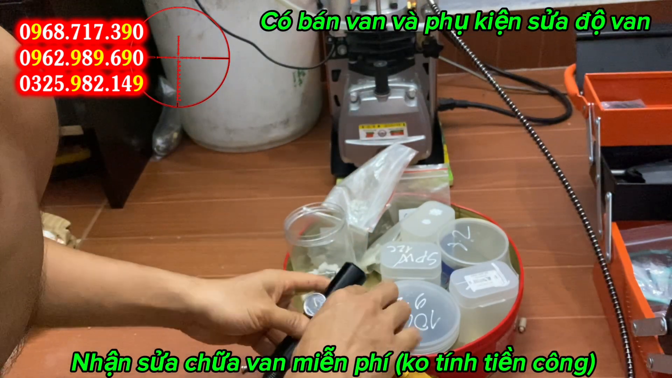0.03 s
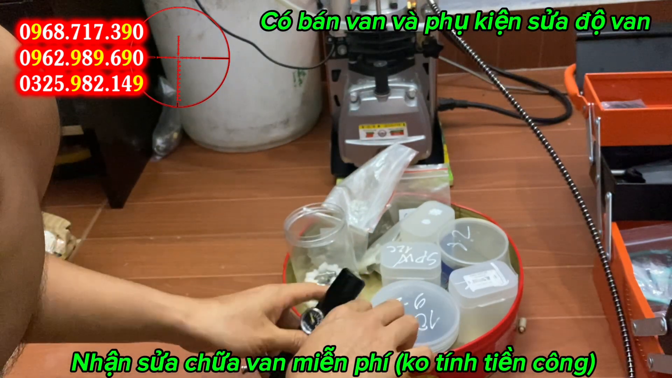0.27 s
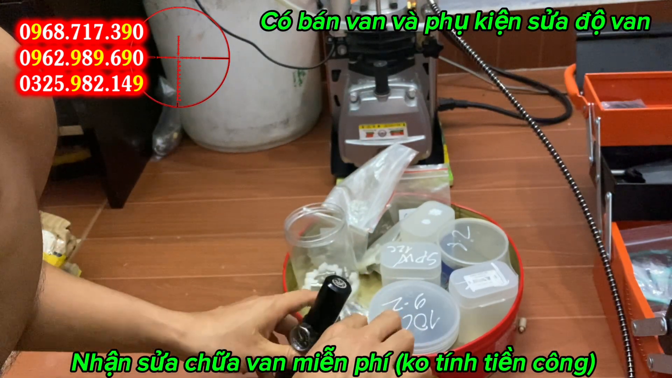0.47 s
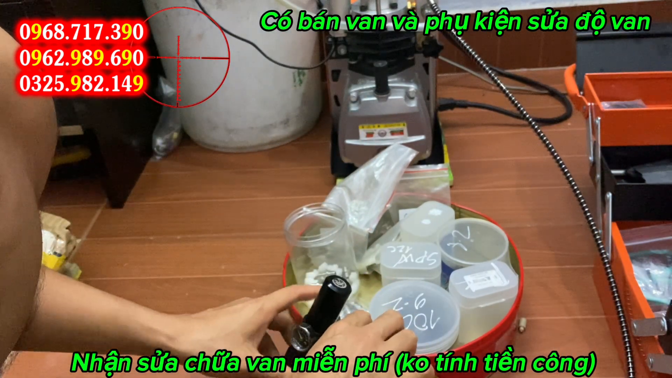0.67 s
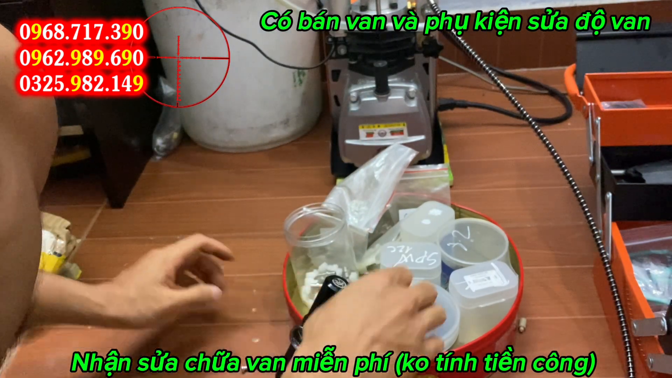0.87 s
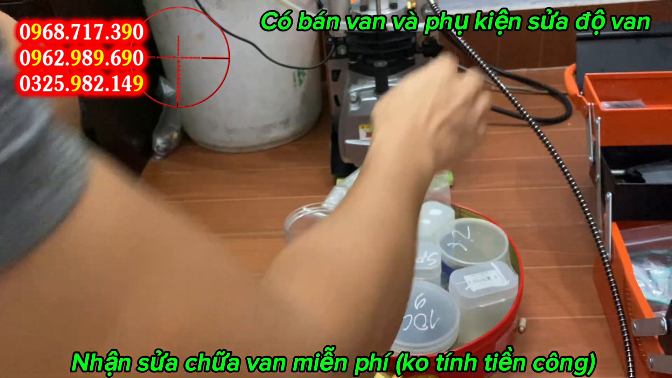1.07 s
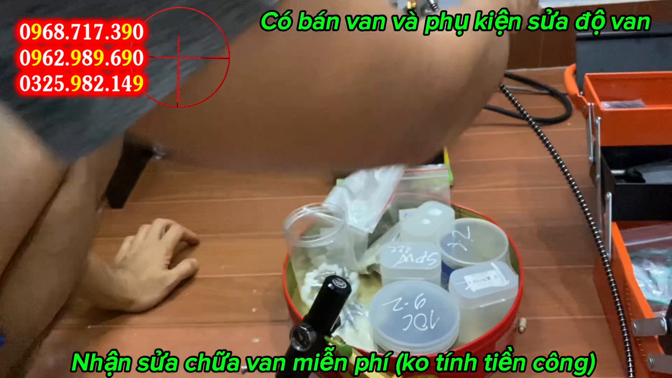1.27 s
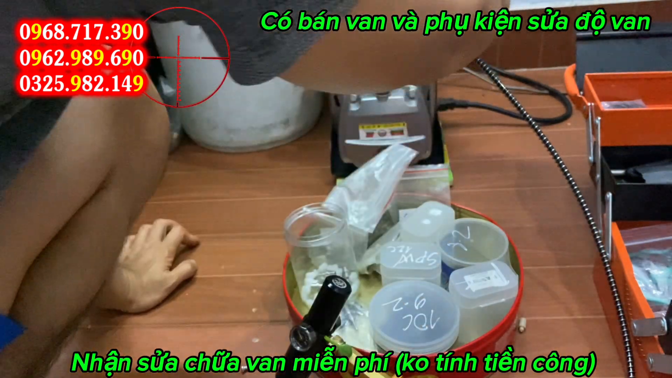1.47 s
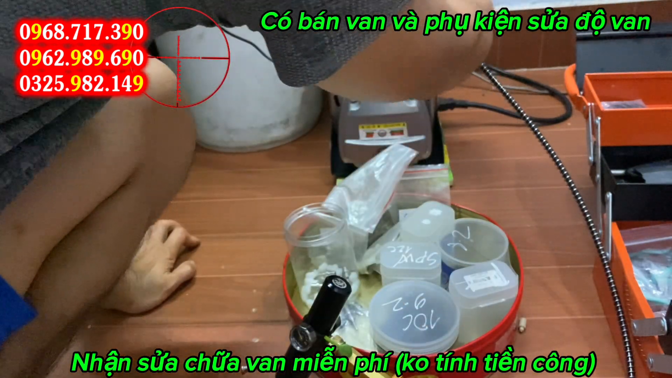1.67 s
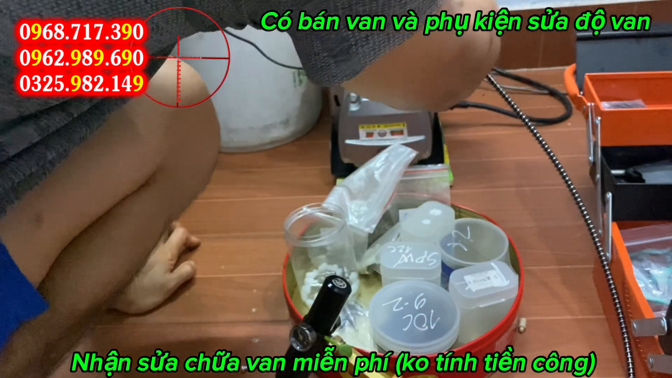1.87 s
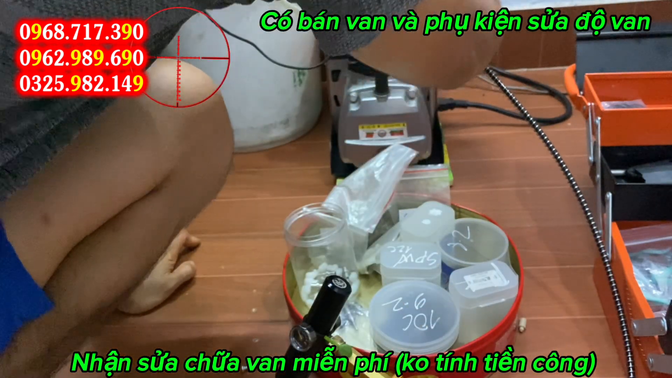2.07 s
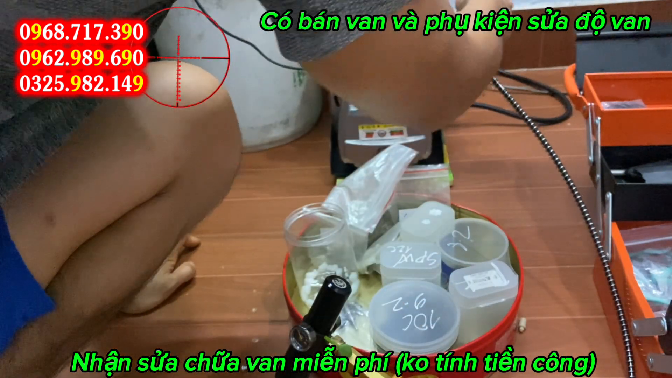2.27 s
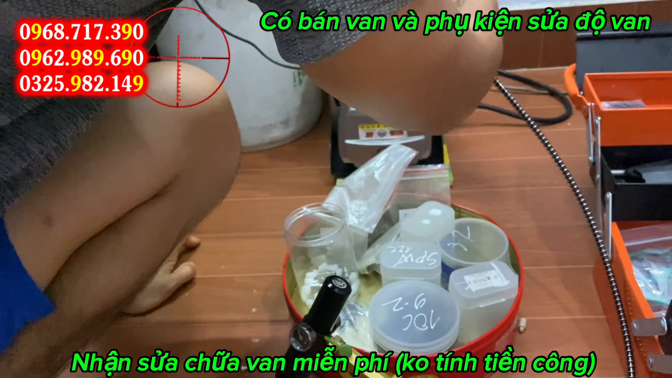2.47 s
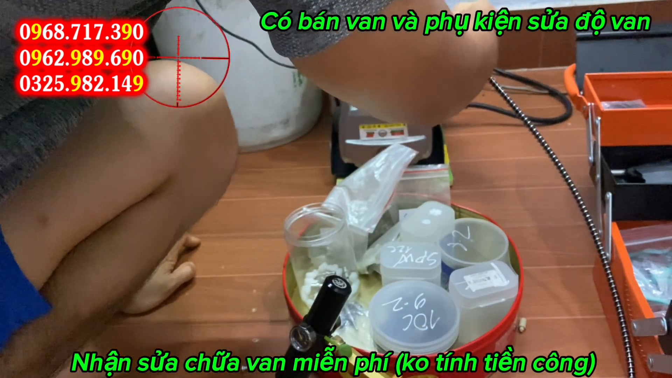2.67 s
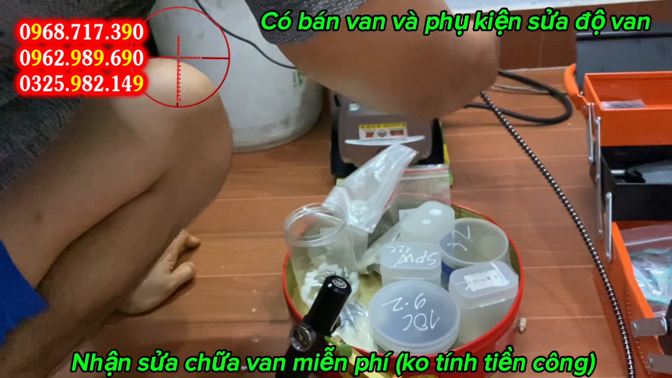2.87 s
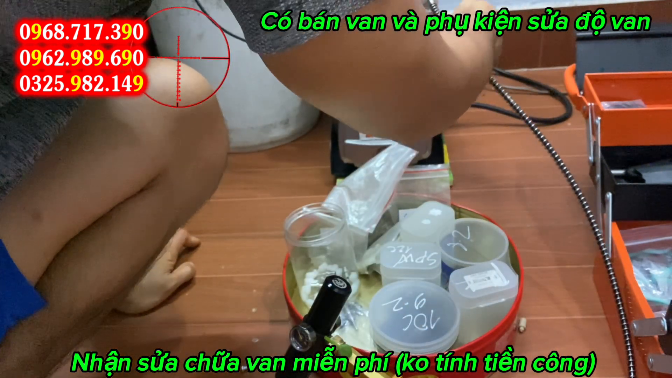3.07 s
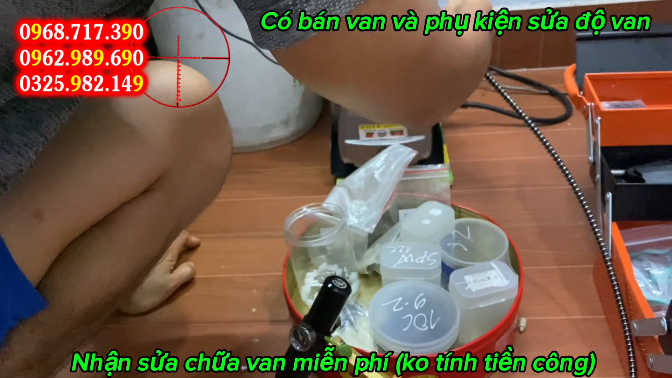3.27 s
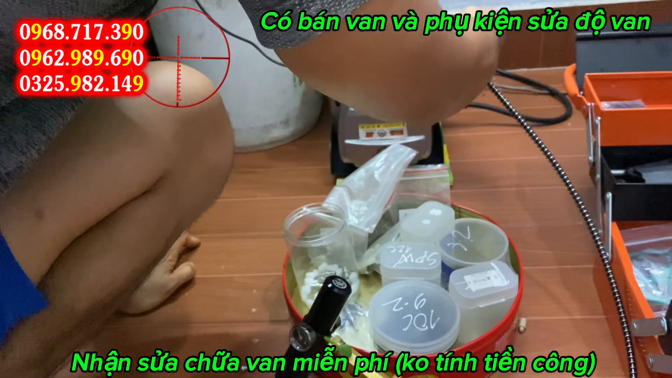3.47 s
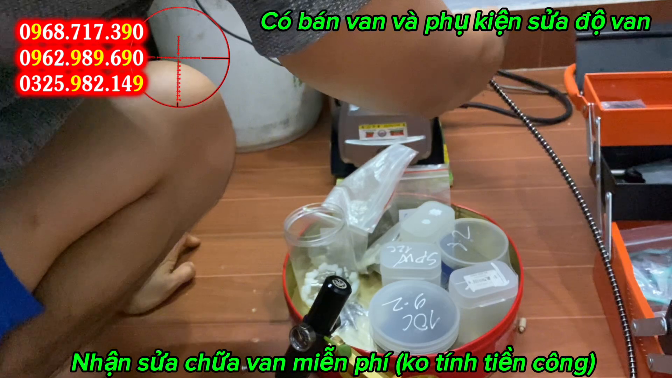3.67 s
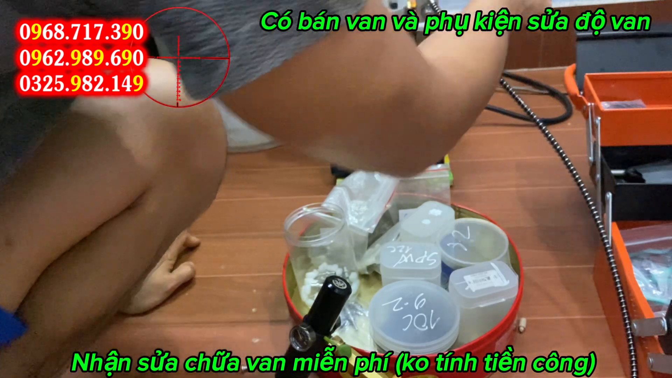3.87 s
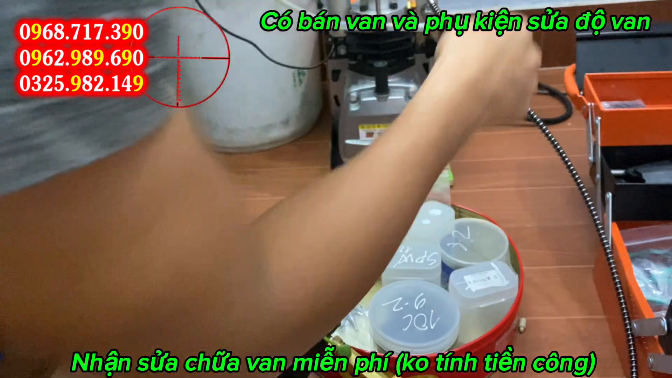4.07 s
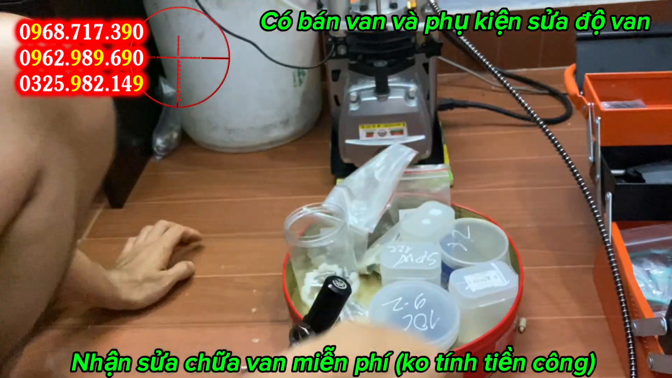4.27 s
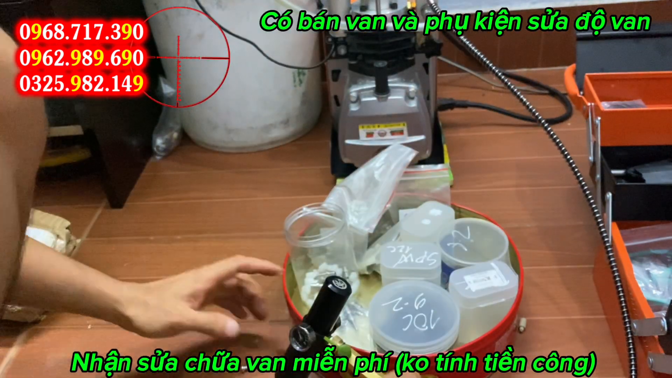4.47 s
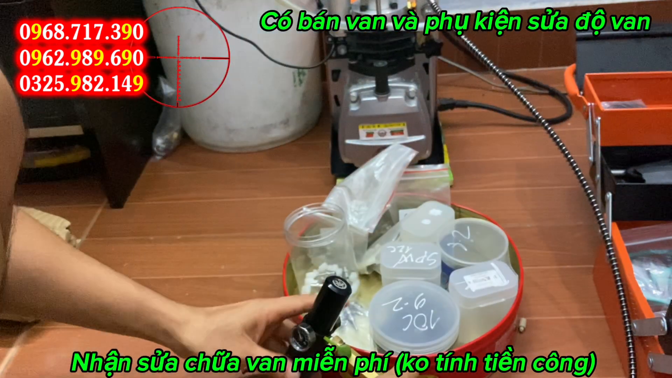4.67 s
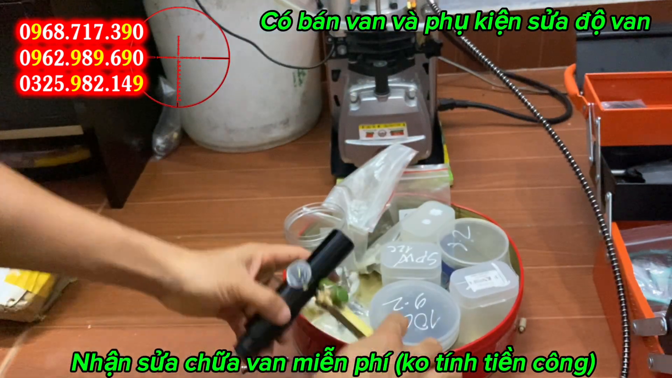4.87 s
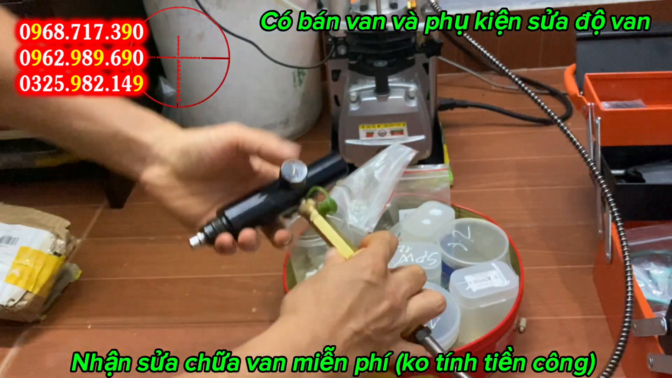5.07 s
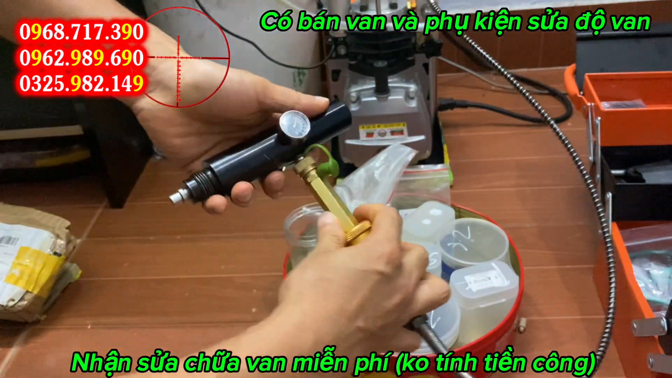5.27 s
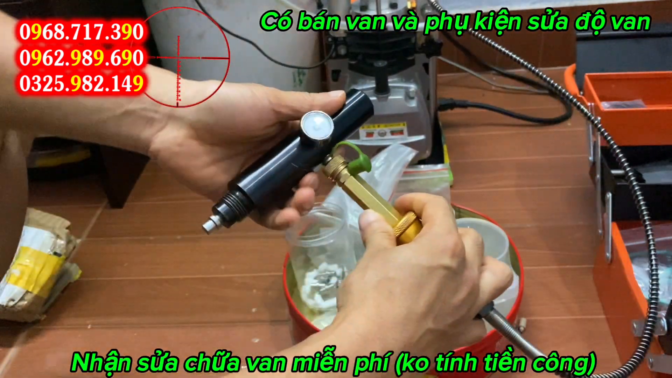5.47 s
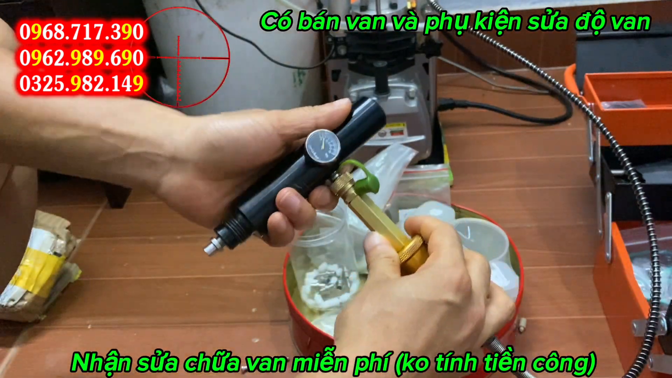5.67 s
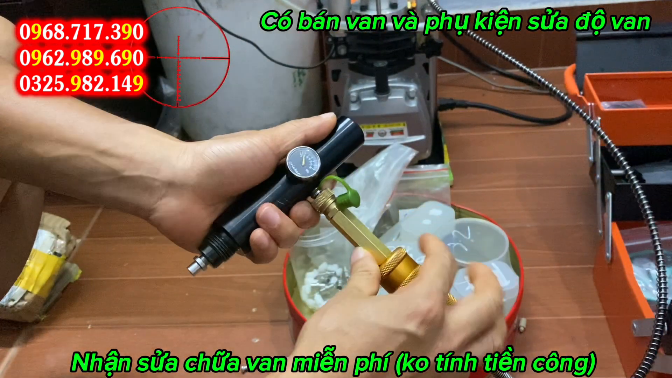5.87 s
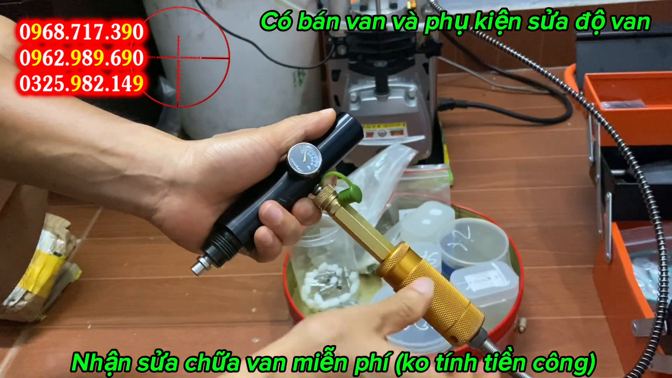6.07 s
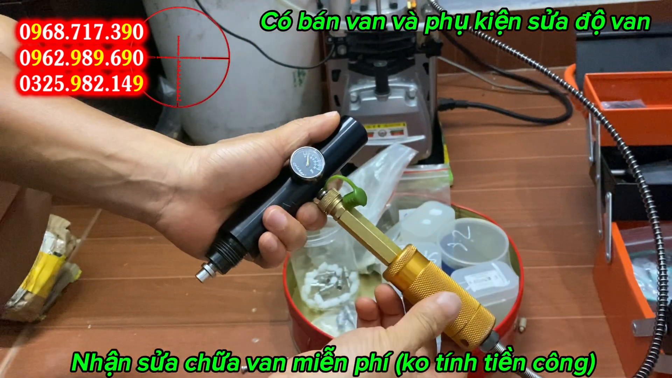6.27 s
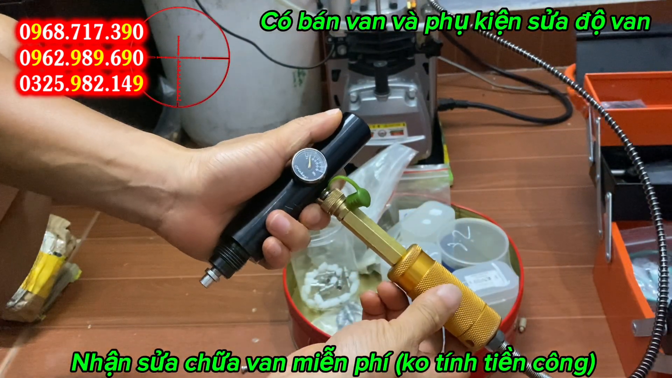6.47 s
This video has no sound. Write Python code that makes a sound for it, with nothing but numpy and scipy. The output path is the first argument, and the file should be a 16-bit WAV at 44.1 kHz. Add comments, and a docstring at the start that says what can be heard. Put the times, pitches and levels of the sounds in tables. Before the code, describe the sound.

In the first half second, metal valve fittings are put down with a quick cluster of light clicks, clacks and short rings. A quiet stretch follows, with only low room rumble, faint electrical hum, a barely audible rustle of clothes and a few tiny taps around 1.6 to 1.9 seconds. At about 2 seconds a switch snaps, and a small electric piston compressor groans, kicks a few times and reaches speed almost at once. It runs with a loud, steady drone, very rapid knocking and bright valve ticking. Air vents with a hiss from about 2.3 seconds, sharpening and dying away near 2.9 as the bleed screw shuts. Pressure then builds: the motor slows very slightly, the rattle softens a little and the hum changes colour, continuing until the end at about 6.6 seconds. Everything is close, in a small workshop with short reverberation.

```python
"""A small high-pressure piston compressor, close by on a workshop floor, at about 47 strokes a second.
The piston shakes the frame into a drone; each stroke knocks the crank case and ticks the valves.
Air vents until the bleed screw shuts; pressure then builds, the motor slows a little and the hum
changes colour. Before the run, metal fittings click as they are put down, clothes rustle, a switch
snaps and the motor groans up to speed. Room rumble and mains hum lie underneath."""
import sys
import numpy as np
from scipy import signal
from scipy.fft import rfft, irfft, next_fast_len
from scipy.io import wavfile
from scipy.ndimage import map_coordinates

SR = 44100
rng = np.random.default_rng(int(sys.argv[2]) if len(sys.argv) > 2 else 0)


def bounce(signal):
    """Save signal as a 16-bit WAV file at the path given by the first command-line argument."""
    frames = np.transpose(np.atleast_2d(signal))
    limited = np.clip(frames, -1, 1)
    pcm = np.round(limited * 32767).astype(np.int16)
    wavfile.write(sys.argv[1], SR, pcm)


N = 287532
TIME = np.arange(N) / SR
START_S, SHUT_S = 2.0369, 2.8334  # crank breaks free, bleed screw shuts
RUN_HZ = 47.844  # unloaded crank speed

# valve tick, contact clack and floor thud spectra: (frequency [Hz], density [dB])
VALVE_SPECTRUM = [(1000, -15.5), (2300, -5), (4000, -10.5), (5600, -13.5), (6700, -0.5), (8400, -14),
                  (9600, 3), (10300, 5.5), (11200, -9), (12000, -57), (13200, -25), (15500, -34)]
CLACK_SPECTRUM = [(150, -28), (450, -1.5), (750, -2.5), (1150, 4), (1700, -5.5), (3000, -11), (4500, -21),
                  (7500, -19), (12000, -70)]
THUD_SPECTRUM = [(50, -18), (110, -25), (170, 3), (300, 1), (450, 1.5), (800, -5), (2000, -33)]


def compressor():
    """The crank spins up; with the bleed screw shut, pressure builds and slows it a little."""
    spin_up_s, sag_hz = 0.1, 0.469
    speed_hz = np.clip((TIME - START_S) / spin_up_s, 0, 1) * (RUN_HZ - sag_hz * since_shut(tau_s=0.7866))
    turns = np.cumsum(speed_hz) / SR
    pressure = np.clip(0.29 + 0.78 * since_shut(tau_s=2.46), 0, 1)  # share of full
    running = np.clip((TIME - START_S) / 0.042, 0, 1)
    wash = reflections(clatter(turns, pressure) + air())
    return running * (hum(turns, pressure) + knocks(turns, pressure) + valves(turns, pressure) + wash)


def hum(turns, pressure):
    """The piston shakes the frame at every crank order; pressure shifts their balance."""
    # hum with the hose empty and filled: (crank order, relative level [dB])
    empty_orders = [(1, -9), (2, -10), (3, -20), (4, -18.5), (5, 0), (6, -12), (7, -21.5), (8, -35),
                    (9, -24), (10, -32.5), (11, -23.5), (12, -11), (13, -24.5), (14, -21.5), (15, -29),
                    (16, -26.5), (17, -26), (18, -32), (19, -27.5), (20, -16), (21, -24.5), (22, -19.5),
                    (23, -23), (24, -42)]
    filled_orders = [(1, -16), (2, -13), (3, -62), (4, -20.5), (5, 0), (6, -11), (7, -21), (8, -32),
                     (9, -12), (10, -17.5), (11, -23.5), (12, -38.5), (13, -37.5), (14, -25), (15, -43),
                     (16, -39.5), (17, -46), (18, -34.5), (19, -21), (20, -46), (21, -46), (22, -41.5),
                     (23, -31.5), (24, -42), (25, -30.5), (26, -26), (27, -29), (28, -63), (29, -30),
                     (30, -38), (31, -29), (32, -51.5)]
    # orders the frame sings with: (time [s], 5th order [dB], 9th order [dB])
    drone_levels = [(2.3, -10.5, -34), (2.91, -15, -43), (3.03, -12.5, -26.5), (3.22, -11, -29),
                    (3.96, -9.5, -22), (4.62, -12, -24), (5.15, -11.5, -22), (6.45, -11.5, -22.5)]
    # stereo width: (frequency [Hz], side minus mid [dB])
    width = [(50, -16), (200, -20), (260, -24.5), (330, -4), (430, -8), (560, -4.5), (900, -2), (1500, -8)]
    shake_db = -18.5 - 7.11 * pressure + run_up(rise_s=0.16, depth_db=25)
    fifth_db, ninth_db = curves(drone_levels) + run_up(rise_s=0.27, depth_db=45)
    empty, filled = ({round(k): db for k, db in rows} for rows in (empty_orders, filled_orders))
    out = np.zeros((2, N))
    for order, filled_db in filled.items():
        empty_db = empty.get(order, filled_db)
        colour_db = (1 - pressure) * (empty_db - empty[2]) + pressure * (filled_db - filled[2])
        level_db = {5: fifth_db + 0.25, 9: ninth_db - 0.2}.get(order, shake_db + colour_db)
        loose = min(order / 30, 1)  # high orders waver more
        waver_db = loose * (2.46 * wobble(6) + 0.96 * wobble(35) - 3.8 + pressure)
        phase = 2 * np.pi * (order * turns + rng.random()) + 0.31 * loose * wobble(17)
        side = amp(along(width, order * RUN_HZ)) * rng.choice([-1, 1]) * np.array([[1], [-1]])
        out += amp(level_db + waver_db) * np.sqrt(2) * (np.sin(phase) + side * np.cos(phase))
    return out * amp([[-0.75], [0.75]])


def knocks(turns, pressure):
    """Play in the connecting rod knocks once a turn, hardest while no air cushions the piston."""
    # crank case modes: (frequency [Hz], level [dB], t60 [s])
    case_modes = [(995, 0.5, 0.023), (1190, 4.5, 0.016), (1400, -1, 0.012), (1604, -2.5, 0.013),
                  (2100, -16, 0.013), (2620, -2.5, 0.013)]
    jitter_s, contact_s = 0.00019, 0.0004
    hits = np.searchsorted(turns, np.arange(4, int(turns[-1]) + 1) + 0.0054)
    timing, strength = rng.standard_normal((len(hits), 2)).T
    hits = np.clip(hits + (jitter_s * SR * timing).astype(int), 0, N - 1)
    force_db = loose_parts_db(pressure)[hits] + 10 - 16 * pressure[hits] + 1.1 * strength
    pulses = np.bincount(hits, amp(force_db), N)
    t = np.arange(SR // 20) / SR
    ring = np.zeros((2, len(t)))
    for hz, db, t60_s in case_modes:
        phase = 2 * np.pi * (hz * t + rng.random()) + rng.normal(0, 0.34, (2, 1))
        ring += amp(db - 60 * t / t60_s) * np.sin(phase)
    onset = 1 - np.exp(-t / contact_s)
    return signal.fftconvolve(pulses[None], ring * onset, axes=1)[:, :N]


def clatter(turns, pressure):
    """Loose parts rattle after both dead centres; part of the bright rattle repeats every turn."""
    # crank case rattle: (frequency [Hz], density [dB])
    case_spectrum = [(25, -24), (65, -5), (150, -5.5), (300, 3.5), (480, 0), (580, 4.5), (740, -7.5),
                     (980, -1.5), (1300, -4), (1600, -4), (1800, -6.5), (2050, -5), (2700, -9.5),
                     (3200, -10.5), (12000, -41.5)]
    blows = 0.63 + (1.2 - 0.14 * pressure) * strokes(turns, at_turn=-0.008, t60_s=0.043, scatter_db=4.5)
    blows += 0.77 * strokes(turns, at_turn=0.532, t60_s=0.017, scatter_db=-4.5)
    one_turn = rng.standard_normal((2, 900))
    repeating = np.array([np.interp(turns % 1, np.linspace(0, 1, len(row)), row) for row in one_turn])
    repeating = filtered(repeating, lambda hz: hz > 1400)
    rattle = 0.34 * unit(repeating) + 0.79 * rng.standard_normal((2, N))
    level_db = loose_parts_db(pressure) - 2.06 + 2.7 * pressure + 0.24 * wobble(6.4)
    return amp(level_db) * spread(rattle * blows, case_spectrum) * amp([[0.6], [-0.6]])


def valves(turns, pressure):
    """The valves flutter while the air runs free and snap shut once a turn under pressure."""
    # bouts of harder chatter: (start [s], hold [s])
    bouts = [(2.97, 0.072), (3.097, 0.134), (3.375, 0.14), (3.63, 0.296), (3.95, 0.075), (4.14, 0.23),
             (4.43, 0.19), (4.68, .11), (4.89, .11), (5.503, 0.36), (6.125, 0.27)]
    chatter = sum(swell(start_s, 0.01, hold_s, 0.01) for start_s, hold_s in bouts)
    base_db = -38.5 + 6.5 * screw_open() + 3.5 * chatter + run_up(rise_s=0.14, depth_db=48)
    flutter = 0.8 - 0.52 * pressure
    snap = (1.9 + 1.5 * pressure) * strokes(turns, at_turn=-0.0006, t60_s=0.032, scatter_db=7.0)
    return amp(base_db) * (flutter + snap) * noise(VALVE_SPECTRUM)


def air():
    """Air hisses in the head, vents as the bleed screw turns and jets through the closing gap."""
    # hiss and jet spectra: (frequency [Hz], density [dB])
    hiss_spectrum = [(1500, -29), (3000, -10), (4500, 1.5), (5800, -1.5), (6800, 1), (8400, -8), (10000, 2),
                     (11200, -9), (12000, -54), (13200, -2), (15500, -23)]
    jet_spectrum = [(2500, -35), (4800, -3), (6000, 3), (7200, -3), (9000, -20), (15000, -33)]
    # vent and jet envelopes: (start [s], attack [s], hold [s], release [s])
    vent_timing = (2.32, 0.072, 0.27, 0.12)
    jet_timing = (2.62, 0.06, 0.026, 0.21)
    hiss = amp(-35.5 + 2 * screw_open() + run_up(rise_s=0.16, depth_db=32))
    vent = amp(-36.5) * swell(*vent_timing)
    jet = amp(-28) * swell(*jet_timing)
    return (hiss + vent) * noise(hiss_spectrum) + jet * noise(jet_spectrum)


def start_up():
    """The motor groans against the standing piston, which lets go with a few heavy kicks."""
    # groan envelope: (start [s], attack [s], hold [s], release [s])
    groan_timing = (1.975, 0.12, 0.055, 0.044)
    # groan pitch: (time [s], frequency [Hz])
    groan_pitch = [(2.0, 612), (2.04, 562), (2.065, 513), (2.095, 572), (2.125, 534), (2.155, 600)]
    # first heavy strokes: (time [s], relative level [dB])
    first_strokes = [(2.065, -23), (2.095, -9), (2.112, -28), (2.1262, -4), (2.149, -11)]
    groan_hz, = curves(groan_pitch)
    groan = swell(*groan_timing) * amp(-30 + 2.1 * wobble(60)) * tone(np.cumsum(groan_hz) / SR)
    strain = amp(-38) * noise(THUD_SPECTRUM) + amp(-40.5) * noise(CLACK_SPECTRUM)
    strain *= decay(1.968, t60_s=3.4, attack_s=0.026)
    kicks = noise(CLACK_SPECTRUM) + amp(-8) * noise(VALVE_SPECTRUM)
    kicks *= sum(amp(db - 7) * decay(start_s, t60_s=0.03) for start_s, db in first_strokes)
    return groan + strain + kicks


def strokes(turns, at_turn, t60_s, scatter_db):
    """One dying burst per crank turn, each of its own strength."""
    count, fraction = np.divmod(turns - at_turn + 1, 1)
    age_s = fraction / RUN_HZ
    strength = amp(scatter_db * np.tanh(rng.standard_normal(512)))
    return strength[count.astype(int)] * amp(-60 * age_s / t60_s) * (1 - np.exp(-age_s / 0.00072))


def loose_parts_db(pressure):
    """Base level of the loose parts, which quieten as air cushions the piston."""
    return -24.5 - 6 * pressure + 2.5 * screw_open() + run_up(rise_s=0.19, depth_db=25)


def run_up(rise_s, depth_db):
    """Gain rising from -depth_db to 0 dB once the crank moves."""
    return -depth_db * (1 - np.clip((TIME - START_S) / rise_s, 0, 1)) ** 2


def screw_open(closing_s=0.19):
    """Bleed screw position: 1 open, 0 shut."""
    return np.clip(0.5 + (SHUT_S - TIME) / closing_s, 0, 1)


def since_shut(tau_s):
    """Creeps from 0 toward 1 once the bleed screw is shut."""
    return 1 - np.exp(-np.maximum(TIME - SHUT_S, 0) / tau_s)


def clicks():
    """Each contact gives a clack, a floor thud, a bright snap and a short metal ring."""
    # fittings, hands, switch; relative levels:
    # (time [s], level [dB], thud [dB], snap [dB], ring [dB], t60 [s])
    contacts = [(0.022, -36, 8, -15, -13, 0.12), (0.03, -34.5, -2, -11, -21, 0.19),
                (0.0596, -15, -11, -1, -25, 0.055), (0.0622, -15, -2, -20, -16, .1),
                (0.1, -23.5, -8, 7, -16, 0.066), (.107, -17.5, -7, -8, -2, 0.094),
                (.1165, -20, -3, -10, -18, 0.11), (0.232, -20, -22, -10, 2.5, 0.12),
                (.319, -20, -16, -12, 0, 0.091), (.3885, -26.5, 8.5, 5.5, -22, 0.16),
                (0.429, -24, -17, -9, -12, 0.11), (0.488, -36, -4, -18, -16, .12),
                (1.575, -49, 2, 0, -15, .05), (1.592, -48.5, 16.5, -22, -22, .18),
                (1.79, -55, -10, -4, -4, .02), (1.904, -41.5, -7, 6, -15, 0.023),
                (1.968, -30.5, -10, 6, -12, 0.15)]
    # valve body modes: (frequency [Hz], level [dB], t60 [s])
    fitting_modes = [(1120, -10, 0.078), (1190, -9, 0.11), (1574, -0.5, 0.15), (1857, 6.5, 0.066),
                     (2000, 5, 0.083), (2290, 4, 0.045), (2740, -3, .07), (3195, 7, 0.049),
                     (3660, 10, 0.031), (3930, 7, 0.057), (4260, 9.5, 0.028), (6260, -5, 0.066),
                     (6700, -16, .06), (7650, -26, 0.18)]
    clack, thud, snap_noise = noise(CLACK_SPECTRUM), noise(THUD_SPECTRUM), rng.standard_normal((2, N))
    # bright snap: (frequency [Hz], density [dB])
    snap_spectrum = [(1500, -3), (4000, 0), (5700, -2), (7400, 3), (8400, -10), (10000, 1.5), (11200, -12),
                     (12200, -51), (14000, -22), (16000, -32)]
    snap = spread(snap_noise, snap_spectrum)
    t = np.arange(SR // 4) / SR
    out = np.zeros((2, N))
    for start_s, db, thud_db, snap_db, ring_db, t60_s in contacts:
        click = decay(start_s, t60_s) * (clack + amp(thud_db - 8) * thud)
        click += amp(snap_db) * decay(start_s, 0.5 * t60_s) * snap
        first = round(start_s * SR)
        for hz, mode_db, mode_t60_s in fitting_modes:
            envelope = amp(ring_db - 10 + mode_db + rng.normal(0, 2.7, (2, 1)) - 60 * t / mode_t60_s)
            phase = 2 * np.pi * hz * t + rng.normal(0, 0.8, (2, 1))
            click[:, first:first + len(t)] += envelope * np.sin(phase)
        out += amp(db - 8.5) * click
    return out


def reflections(x, count=6, gain=0.15):
    """Quick reflections off the floor and nearby boxes ripple the spectrum."""
    delays = (rng.uniform(0.0015, 0.007, count) * SR).astype(int)
    copies = sum(rng.choice([-1, 1]) * np.pad(x, ((0, 0), (delay, 0)))[:, :N] for delay in delays)
    return (x + gain * copies) / np.sqrt(1 + count * gain ** 2)


def reverb(x):
    """Wall reverberation; the treble dies first."""
    # room decay: (frequency [Hz], t60 [s])
    wall_t60 = [(200, 0.33), (1200, 0.47), (4000, 0.27), (7600, 0.29), (12000, 0.21)]
    hz, t, bins = signal.stft(rng.standard_normal((2, SR // 2)), SR, nperseg=256)
    tail = signal.istft(bins * amp(-60 * t / along(wall_t60, hz)[:, None]), SR, nperseg=256)[1]
    tail = np.pad(tail, ((0, 0), (200, 0)))  # pre-delay
    return signal.fftconvolve(x, tail / np.linalg.norm(tail[0]), axes=1)[:, :N]


def background():
    """Room rumble, wavering mains hum, rustling clothes and a brief faint whistle."""
    # room and cloth spectra: (frequency [Hz], density [dB])
    room_spectrum = [(28, -36), (48, -10), (90, 3), (135, -2), (180, -8.5), (550, -12), (720, -31),
                     (1700, -24.5), (2600, -35), (7500, -43), (10500, -39), (12000, -58)]
    cloth_spectrum = [(500, -7), (1700, -11), (2700, -7), (4000, -4), (7500, -12), (10000, -7),
                      (12000, -24), (14000, -17), (16000, -26)]
    # mains hum: (frequency [Hz], level [dB])
    mains_lines = [(48.7, -57), (75.5, -59), (96, -61.5), (144.2, -62), (192, -72.5), (288, -69)]
    # whistle and rustle envelopes: (start [s], attack [s], hold [s], release [s])
    whistle_timing = (0.61, 0.12, 0.19, 0.31)
    rustle_timing = (0.95, 0.25, 0.34, 0.17)
    mains = sum(amp(db + 1.2 * wobble(3.14)) * tone(hz * TIME + rng.random()) for hz, db in mains_lines)
    whistle = amp(-65) * swell(*whistle_timing) * tone(1210 * TIME)
    rustle = swell(*rustle_timing) * amp(-70 + 1.2 * wobble(30.2)) * noise(cloth_spectrum)
    return amp(-55) * noise(room_spectrum) + mains + whistle + rustle


def amp(db):
    """Decibels to gain."""
    return 10 ** (np.asarray(db) / 20)


def unit(x):
    """Scale to rms 1."""
    return x / np.sqrt(np.mean(x ** 2) + 1e-20)


def tone(cycles):
    """Sine of rms 1."""
    return np.sqrt(2) * np.sin(2 * np.pi * cycles)


def along(points, hz):
    """Read (frequency [Hz], value) points on a log axis."""
    point_hz, values = np.transpose(points)
    return np.interp(np.log(hz + 1), np.log(point_hz + 1), values)


def curves(rows):
    """One value per sample for each column after the time."""
    times_s, *columns = np.transpose(rows)
    return [np.interp(TIME, times_s, column) for column in columns]


def wobble(rate_hz):
    """Smooth random curve, rate_hz knots a second."""
    grid_s = np.linspace(0, N / SR, 2048)
    coarse = map_coordinates(rng.standard_normal(512), [grid_s * rate_hz], mode="wrap")
    return np.interp(TIME, grid_s, coarse)


def swell(start_s, attack_s, hold_s, release_s):
    """Gain that rises to 1, holds and falls to 0."""
    return np.interp(TIME, start_s + np.cumsum(np.abs([0, attack_s, hold_s, release_s])), [0, 1, 1, 0])


def decay(start_s, t60_s, attack_s=0.00063):
    """Envelope of one blow."""
    age_s = np.maximum(TIME - start_s, 0)
    return (1 - np.exp(-age_s / attack_s)) * np.exp(-np.minimum(np.log(1000) * age_s / t60_s, 20))


def filtered(x, response):
    """Apply a frequency response."""
    size = next_fast_len(N + SR // 4)
    return irfft(rfft(x, size) * response(np.fft.rfftfreq(size, 1 / SR)), size)[..., :N]


def spread(pair, spectrum):
    """Colour two unrelated signals and blend them into left and right, rms 1."""
    # left-right likeness: (frequency [Hz], coherence [0-1])
    coherence = [(250, 0.8), (550, 0.64), (1100, 0.57), (2200, 0.46), (4500, 0.35), (9000, 0.38),
                 (14000, 1)]

    def response(hz):
        angle = np.arccos(np.clip(along(coherence, hz), -1, 1)) / 2
        return amp(along(spectrum, hz)) * [np.cos(angle), np.sin(angle)]

    mid, side = filtered(pair, response)
    return unit(np.array([mid + side, mid - side]))


def noise(spectrum):
    """Stereo noise of rms 1."""
    return spread(rng.standard_normal((2, N)), spectrum)


def scene():
    """Handling and start-up in the room, then the running pump."""
    contacts = clicks() + start_up()
    return contacts + amp(-5.5) * reverb(contacts) + compressor() + background()


def record(dry):
    """The left channel leads slightly; nothing passes above the band limit."""
    lead_samples, top_hz = 0.67, 15700
    lead = lambda hz: np.exp(1j * np.pi * lead_samples * hz / SR * np.array([[1], [-1]]))
    return filtered(dry, lambda hz: lead(hz) * (hz < top_hz))


dry = scene()
out = record(dry)
bounce(out)
```